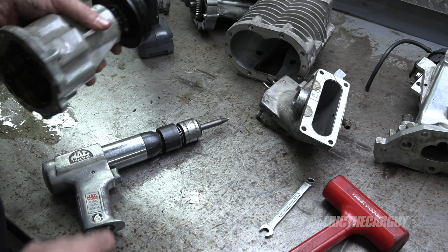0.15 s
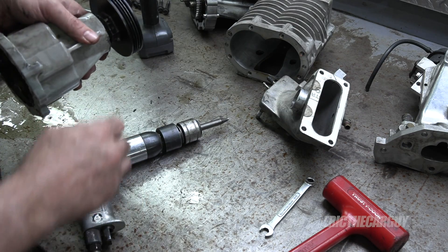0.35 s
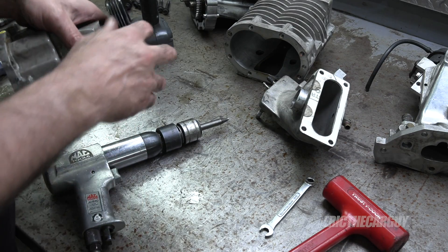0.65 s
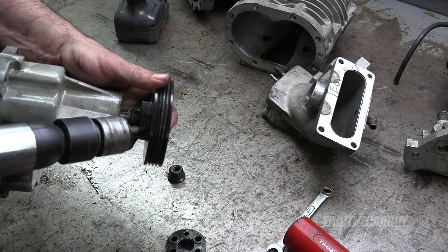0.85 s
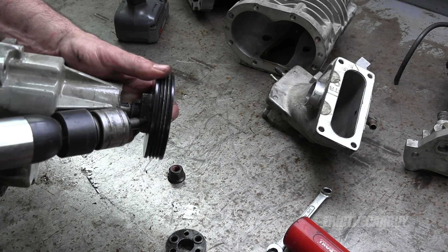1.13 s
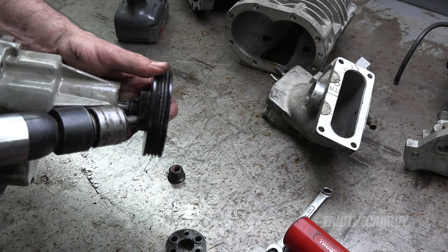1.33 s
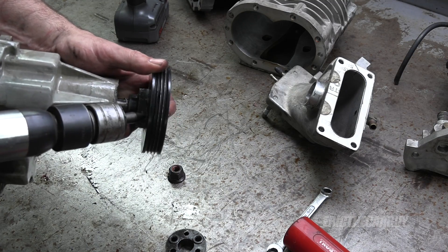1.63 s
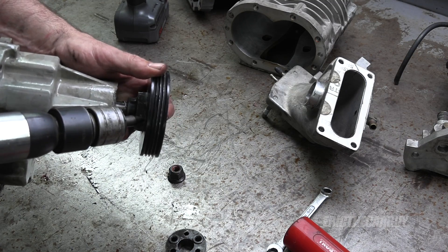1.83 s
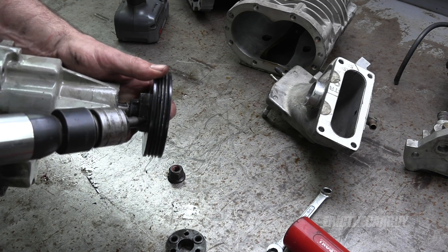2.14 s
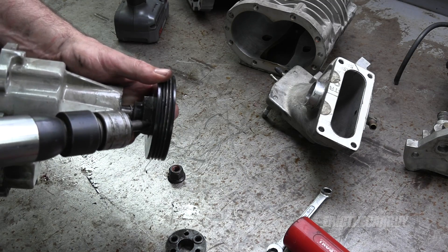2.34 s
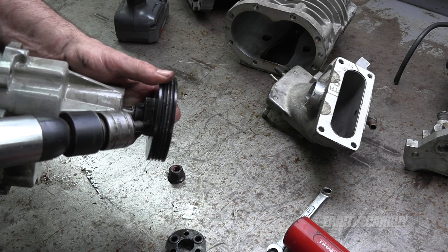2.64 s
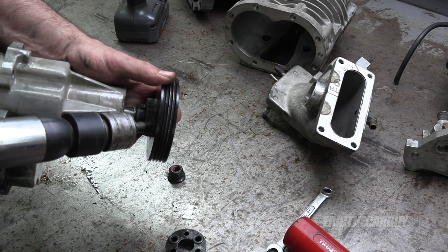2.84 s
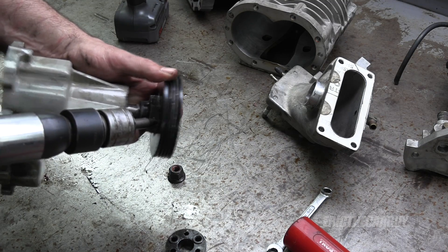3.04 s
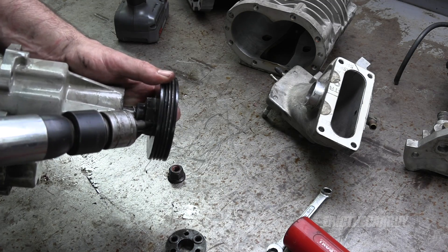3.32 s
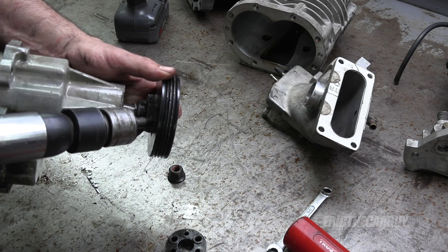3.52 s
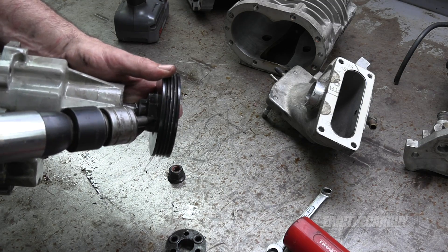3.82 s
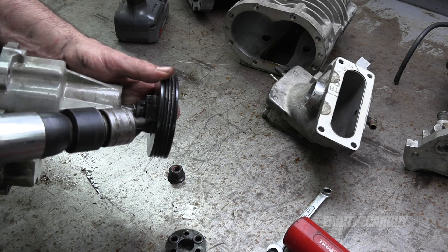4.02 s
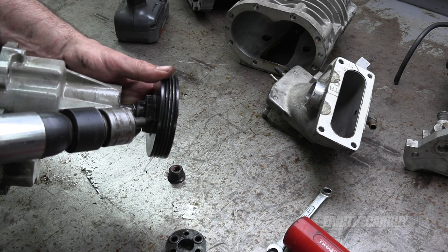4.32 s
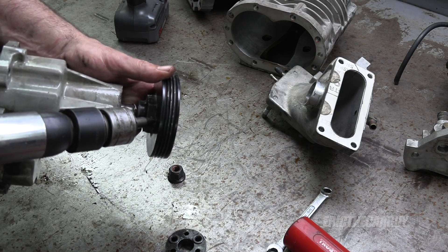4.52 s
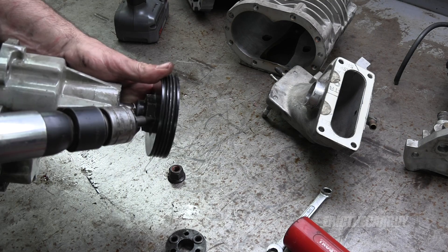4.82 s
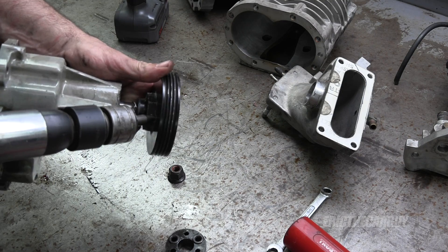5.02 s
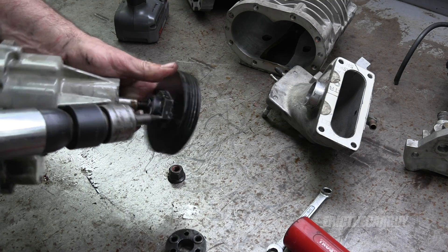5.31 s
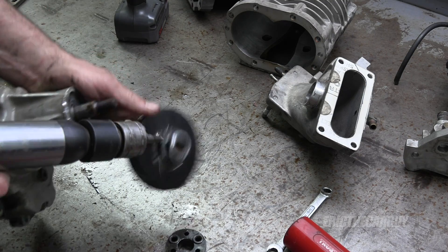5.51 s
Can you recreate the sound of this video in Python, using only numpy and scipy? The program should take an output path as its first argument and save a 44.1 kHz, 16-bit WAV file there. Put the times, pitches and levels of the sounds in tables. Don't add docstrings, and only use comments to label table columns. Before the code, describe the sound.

Close at a workbench, low room rumble gives way abruptly to a pneumatic chisel. Valve hiss and exhaust puffs precede hard steel cracks in groups of two or three, about three groups a second. A high metallic whistle and hub ring fade between them, fading faster as the part loosens. Last blows knock it free; it jingles, clatters and lands. The loud hits sound squashed and slightly distorted.

```python
import sys
import numpy as np
from scipy import signal
from scipy.fft import rfft, irfft, next_fast_len
from scipy.io import wavfile
from scipy.ndimage import uniform_filter1d, minimum_filter1d, map_coordinates

SR = 44100
rng = np.random.default_rng(int(sys.argv[2]) if len(sys.argv) > 2 else 0)


def generate_wav(signal):
    frames = np.transpose(np.atleast_2d(signal))
    scaled = np.clip(frames, -1, 1) * 32767
    pcm = np.round(scaled).astype(np.int16)
    wavfile.write(sys.argv[1], SR, pcm)


def voltage_ratio(decibels):
    exponent = np.asarray(decibels, float) / 20
    return 10 ** exponent


N = 249606
T = np.arange(N) / SR

# (time [s], rumble level [dB], air level [dB])
SHOP_LEVELS = [
    (0, -41.5, -50),
    (.3, -41.5, -46),
    (.55, -39.5, -46),
    (.75, -34, -45.5),
    (.838, -42, -46.5),
    (.842, -38, -54),
    (.912, -48, -54),
    (.93, -74, -57),
    (5.66, -59.5, -78),
]
# (time [s], level [dB])
PART_SET_DOWN = [
    (0.588, -34.5),
]
# (frequency [Hz], gain [dB])
RUMBLE_COLOUR = [(15, -30), (30, -6), (45, -18), (58, 7.5), (75, -13), (110, -2.5), (140, -20.5),
                 (200, -42), (400, -100)]
AIR_COLOUR = [(90, -40), (150, 1), (250, -5.5), (600, -9.5), (1500, -14.5), (1980, -17.5), (2500, -21),
              (3800, -25.5), (4700, -23), (5600, -26), (7500, -20.5), (12000, -27), (14500, -20),
              (15800, -19.5)]
# (frequency [Hz], width [Hz], level [dB])
FAR_MACHINES = [(645, 220, 0.5), (2000, 90, 4), (2950, 200, 0), (4600, 400, 0)]

# (end time [s], level [dB], air flows on for [s],
# speed of the fade [factor], whistle over the level [dB])
WASH = [(1.081, -20.5, 0.17, 0.52, -5.5), (1.468, -24, 0.2, .8, -2.5), (1.758, -25, 0.2, .7, 0),
        (2.083, -24.5, 0.12, 0.65, -0.5), (2.378, -25, 0.073, 1.02, 0), (2.822, -26.5, 0.041, 1.2, 1.5),
        (3.167, -26, 0.039, 0.93, 1.5), (3.644, -28.5, 0.0031, 1.6, 0), (3.895, -26.5, .005, 1.06, 1.5),
        (4.22, -27, 0.0027, 1.6, -0.5), (4.544, -29.5, .005, 1.5, -2.5), (4.792, -27.5, .005, 1.34, -3),
        (5.077, -28, .005, 1.5, -8), (5.485, -28, 0.0028, 2, -4.5)]
# (frequency [Hz], gain [dB])
BOOM_COLOUR = [(25, -8.5), (60, -7), (150, -6.5), (240, 0), (330, -4), (600, -5), (900, -6), (1500, -78)]
BODY_COLOUR = [(290, -44), (500, -10), (557, -50), (661, -5), (2040, -3), (3640, -5.5), (4140, -5.5),
               (5020, -10.5), (6500, -14), (8450, -10), (14300, -120)]
TOP_COLOUR = [(8000, -7), (9500, 4.5), (11000, -4.5), (12600, -1.5), (13500, -15), (14400, -6),
              (15000, -15), (15900, -17)]
# (frequency [Hz], width [Hz], level [dB])
PORT_MODES = [(229, 20, 4)]
HUB_MODES = [(956, 18, 3.5), (1229, 18, 1), (1530, 22, 3), (2013, 19, 6), (4214, 30, 1.5), (1948, 120, 6),
             (2240, 28, -3), (2765, 145, 2), (4040, 42, 9), (4125, 24, 10), (4560, 43, 4.5), (5240, 50, -3)]
EDGE_MODES = [(12940, 220, 9), (14250, 200, 2)]
# (time [s], frequency [Hz])
WHISTLE_CENTRE = [(.9, 8350), (2.4, 8170), (3.3, 7950), (4, 7770), (5.66, 7850)]
# (offset from centre [Hz], gain [dB])
WHISTLE_SKIRT = [(-2600, -19), (-1500, -10), (-700, -1), (-250, 0.5), (2, 4.5), (250, 1), (700, 1),
                 (1300, -14), (2186, -22)]
# (offset from centre [Hz], width [Hz], level [dB])
WHISTLE_CORE = [(60, 190, 0)]
# boom, body, whistle, top
# level over the wash [dB], its drift [dB/s], and its rise while the blows fall [dB]
OVER_DB = [-11.5, -0.3, -0.7, -13.5]
DRIFT_DB_PER_S = [0.12, 0.01, 0.01, 1.96]
STRUCK_DB = [5.5, -3.5, -1.5, -1.5]
SWELL_DB_PER_S = [2, 17.5, 19, -3]
LONGEST_SWELL_S = [0.25, .25, 0.073, 0.058]
FADE_DB_PER_S = [50.3, 47.7, 61.5, 77]
FLOOR_DB = [-50.5, -36, -40, -52]
OPENING_DB = [-24, -37, -32, -22]
SETTLED_DB = [-23, -24.5, -30.5, -41]

# (frequency [Hz], level [dB], T60 [s])
FREE_MODES = [(4064, -27, 0.35), (7900, -23.5, 0.7), (7842, -28, 0.4), (7915, -19, .1), (11294, -36, 0.8),
              (11420, -35, .7), (11360, -17, 0.07), (14800, -24, 0.025)]
LANDING_MODES = [(985, -22, 0.12), (2200, -13.5, .03), (2760, -24, 0.066), (4097, -1.5, .15),
                 (5916, -24, 0.046), (7950, -19, 0.073), (8350, -23, .05), (13280, -27, .3)]
# (time [s], level [dB], frequency [Hz])
CLATTER = [(5.3662, -15, 2850), (5.4545, -12, 3080), (5.462, -24, 1000), (5.372, -23, 2000),
           (3.898, -22, 1900), (3.174, -23, 1980), (4.834, -27, 1880), (.9185, -20, 2200),
           (.938, -17, 4200), (.917, -14, 950), (.94, -17, 1000), (5.403, -17, 1900), (5.393, -15, 540)]

# (time [s], jet level [dB], length [s])
TRIGGER_OPENINGS = [(0.9175, -19, 0.02), (0.944, -24, .02), (1.305, -15.5, 0.023), (1.641, -20.5, 0.03),
                    (1.927, -24, 0.026), (2.221, -23.5, 0.018), (2.705, -28, .025), (3.018, -32, 0.02),
                    (3.467, -37, 0.02), (3.779, -34.5, 0.024), (4.099, -33, 0.025), (4.43, -37, .018),
                    (4.683, -36, .016), (5.256, -31, 0.02)]
# (frequency [Hz], gain [dB])
JET_COLOUR = [(1500, -36), (4000, 1.5), (6500, 6.5), (9500, 6.5), (11000, 2.5), (13500, 3), (14900, -3),
              (15900, 2.5)]

# (time [s], peak level [dB], 2 kHz ring [dB], 4 kHz ring [dB], 8 kHz ring [dB])
FIRST_BLOWS = [(0.9645, 1, -7, -1, -24), (1.3473, -7.5, -1.5, -7, -22), (1.6838, 2, -6, -11, -13),
               (1.9648, -5.5, -9, -14, -13), (2.2624, -4, -6, -9, -8.5), (2.7488, 3, -13, -10, -14),
               (3.0572, -0.5, -7, -7.5, -16), (3.5052, -4, -7, -4, -10), (3.824, 3, -13, -8, -9),
               (4.1452, 1.5, -23, -7, -9), (4.4684, -5.5, -9, -3, -22), (4.7181, -6.5, -4.5, -11, -32),
               (5.0037, -7.5, -3.5, -3, -27), (5.3016, 7, -23, -27, -18)]
NEXT_BLOWS = [(1.005, -1, -5, -7.5, -6), (1.051, -8, -1, -2, -3), (1.39, 2, -8, -15, -11),
              (1.4384, -6, 0.5, -7, -5), (1.727, -2, -4, -16, -10), (2.0061, -1.5, -7.5, -17, -9),
              (2.053, -5, -5, -11, -6.5), (2.303, 0, -7.5, -11, -6), (2.3478, -2.5, -8, -18, -10.5),
              (2.7921, -4, -8, -6, -8), (3.0974, 1, -16, -15, -11), (3.1367, 2, -13, -19, -10),
              (3.5488, 1, -26, -12, -9), (3.6131, -8.5, -8, -5, -12), (3.8647, -0.5, -31, -13, -9),
              (4.1906, -4, -16, -14, -11.5), (4.514, -1, -15, -16, -13), (4.7625, -0.5, -17, -27, -14),
              (5.047, 0, -10.5, -16, -15), (5.34, 5.5, -10, -15, -17), (5.3903, -6.5, -23, -27, -19)]
SPIKE_TIMES = [.9619, 1.0013, 1.049, 1.3447, 1.3882, 1.4352, 1.6819, 1.7246, 1.9615, 2.0037, 2.0502, 2.26,
               2.3016, 2.3455, 2.7466, 2.79, 3.0544, 3.0958, 3.1349, 3.5012, 3.5464, 3.6093, 3.8213, 3.8627,
               4.1431, 4.1877, 4.4636, 4.5111, 4.7139, 4.76, 5.0007, 5.0453, 5.2992, 5.3387, 5.3876]
# (level [dB], port echo [dB], edge ring [dB])
SLUGS = [(-16, 0, -28), (-18, 2, -28), (-16, -1, -28), (-15, -2, -28), (-14, -5, -30), (-18, -4, -28),
         (-17.5, -3, -30), (-19, -2, -28), (-15, -2, -28), (-18, 2, -28), (-20, 0, -26), (-16, 1, -26),
         (-16, 4, -28), (-21, 8, -26), (-16, -1, -24), (-18, 2, -19), (-17, 0, -25), (-19, 4, -23),
         (-16, -1, -20), (-18, -2, -25), (-16, 0, -23), (-26, -2, -19), (-17, 0, -23), (-17, 1, -21),
         (-15, 0, -24), (-22, -1, -20), (-17, -5, -25), (-15, -1, -26), (-19, -1, -25), (-15, -2, -24),
         (-19, 2, -26), (-17, 0, -27), (-16, 0, -34), (-17, 2, -32), (-23, -6, -36)]
# (time [s], level [dB], second slug [dB])
VALVE_PUFFS = [(0.9147, -15, -14), (.935, -11, 1.5), (1.023, -17, -6), (1.201, -26, -6), (1.246, -26, -4),
               (1.318, -11.5, 6), (1.654, -10.5, -0.5), (1.946, -13.5, -17), (2.233, -15, -1),
               (2.7191, -16.5, -3), (3.0276, -27, -15), (3.0373, -24, -20), (3.485, -21.5, -16),
               (3.7936, -19.5, -8), (4.115, -21.5, -2), (4.446, -23.5, -11), (4.677, -34, -15),
               (4.6995, -24, -6), (4.952, -27, -13), (4.984, -22, -5), (5.0636, -21, -15),
               (5.2722, -19.5, -2)]
# (time [s], delay [s], level [dB])
RETURN_PUFF = [
    (2.2, 0.019, -32),
    (3.0, 0.013, -23),
    (4.2, .0125, -24),
    (4.5, .0135, -21.5),
    (5.0, 0.014, -21),
]
# (frequency [Hz], gain [dB])
CRACK_COLOUR = [(200, -11), (350, 3.5), (900, 4), (1550, -1), (2000, 3.5), (2700, 5.5), (3400, 0.5),
                (4200, 3.5), (5800, -7.5), (8000, 3), (10300, -5.5), (13000, -9.5), (13600, -9),
                (16000, -15)]
# (frequency [Hz], level in group [dB], T60 [s])
LOW_MODES = [(942, -6.5, 0.034), (2016, -1.5, 0.12), (2203, -10, 0.053), (2810, -5, 0.035)]
MID_MODES = [(4020, -9, 0.091), (4028, -15.5, 0.098), (4126, -5.5, 0.15), (4178, -9.5, 0.073),
             (4590, -8, 0.073)]
# (offset from its centre [Hz], level in group [dB], T60 [s])
HIGH_MODES = [(-180, -3, 0.064), (-39, -11, 0.034), (168, 0.5, 0.084)]
# (frequency [Hz], level under the blow [dB], T60 [s])
CHISEL_MODES = [(4110, -3, .014), (955, -16, .018), (4600, -13, .04)]

WHISTLE_LAYER, TOP_LAYER = 2, 3
OPEN_S, RISE_S, SETTLE_S = .915, 0.0054, 0.03
LEAD_S, BUILD_S = 0.043, 0.038
LOOSE_S, DROP_S = 5.392, 5.6414
FREED_DB = -9
RESTRIKE_S, RESTRIKE_DB = 5.9, -12
SEAT_S = .0016
SPIKE_S = 3 / 1000


def unit(x):
    return x / np.sqrt(np.mean(x ** 2) + 1e-20)


def curves(rows):
    s, *cols = np.transpose(rows)
    return [np.interp(T, s, c) for c in cols]


def colour(points, hz):
    f, db = np.transpose(points)
    return voltage_ratio(np.interp(np.log(hz + 1), np.log(f), db))


def noise(gain, n=N):
    hz = np.fft.rfftfreq(next_fast_len(n + 2048), 1 / SR)
    spectrum = rfft(rng.standard_normal(2 * len(hz) - 2))
    return unit(irfft(gain(hz) * spectrum)[:n])


def patchy(gain, patchy_db):
    hz, s, z = signal.stft(rng.standard_normal(N), SR, nperseg=512)
    field = uniform_filter1d(rng.standard_normal(z.shape), size=4, axis=0)
    field = uniform_filter1d(field, size=4, axis=1)
    shaped = z * gain(hz[:, None], s) * voltage_ratio(patchy_db * unit(field))
    return unit(signal.istft(shaped, SR, nperseg=512)[1][:N])


def peaks(modes, hz):
    return sum(voltage_ratio(2 * db) / (1 + (2 * (hz - c) / w) ** 2) for c, w, db in modes)


def ring(hz, db, t60, t, attack=0.0005):
    return voltage_ratio(db - 60 * t / t60) * (1 - np.exp(-t / attack)) * np.sin(2 * np.pi * hz * t)


def flutter(depth_db, knots, rate_hz, t):
    return voltage_ratio(depth_db * map_coordinates(rng.standard_normal(knots), [t * rate_hz]))


def crack(t):
    return noise(lambda hz: colour(CRACK_COLOUR, hz), len(t))


def add(track, s, sound):
    track[round(s * SR):][:len(sound)] += sound


def shop():
    rumble_db, air_db = curves(SHOP_LEVELS)
    rumble = noise(lambda hz: colour(RUMBLE_COLOUR, hz))
    air = patchy(lambda hz, s: colour(AIR_COLOUR, hz) * np.sqrt(1 + peaks(FAR_MACHINES, hz)), patchy_db=1.5)
    out = voltage_ratio(rumble_db) * rumble + voltage_ratio(air_db) * air
    for s, db in PART_SET_DOWN:
        add(out, s, ring(840, db + 0.5, .04, T[:3000]))
    return out


def hang(layer):
    knots = [(OPEN_S, -70), (OPEN_S + RISE_S, OPENING_DB[layer]), (OPEN_S + SETTLE_S, SETTLED_DB[layer])]
    starts = [row[0] for row in FIRST_BLOWS] + [DROP_S + LEAD_S]
    for start, following, (end, db, flow, speed, whistle_db) in zip(starts, starts[1:], WASH):
        level = db + OVER_DB[layer] + DRIFT_DB_PER_S[layer] * (end - OPEN_S)
        level += whistle_db * (layer == WHISTLE_LAYER)
        level += FREED_DB * (layer == TOP_LAYER and end > LOOSE_S)
        left = following - LEAD_S - end
        swell = np.clip(min(flow, LONGEST_SWELL_S[layer]), 1e-3, left - 1e-3)
        crest = level + SWELL_DB_PER_S[layer] * swell
        faded = crest - speed * FADE_DB_PER_S[layer] * (left - swell)
        if start > starts[0]:
            knots.append((start + BUILD_S, level + STRUCK_DB[layer]))
        knots += [(end, level), (end + swell, crest), (end + left, faded)]
    return np.hypot(voltage_ratio(curves(knots)[0]), voltage_ratio(FLOOR_DB[layer]) * (T > OPEN_S + RISE_S))


def whistle_wash():
    def gain(hz, s):
        off = hz - np.interp(s, *np.transpose(WHISTLE_CENTRE))
        skirt = voltage_ratio(np.interp(off, *np.transpose(WHISTLE_SKIRT), -90, -90))
        return skirt * np.sqrt(1 + peaks(WHISTLE_CORE, off))
    return patchy(gain, patchy_db=1.6)


def garage():
    boom = noise(lambda hz: colour(BOOM_COLOUR, hz) * np.sqrt(1 + peaks(PORT_MODES, hz)))
    body = patchy(lambda hz, s: colour(BODY_COLOUR, hz) * np.sqrt(1 + peaks(HUB_MODES, hz)), patchy_db=0.5)
    top = noise(lambda hz: colour(TOP_COLOUR, hz) * np.sqrt(1 + peaks(EDGE_MODES, hz)))
    layers = [boom, body, whistle_wash(), top]
    return sum(hang(layer) * sound for layer, sound in enumerate(layers))


def loose_hub():
    out, t = np.zeros(N + SR), np.arange(SR // 3) / SR

    def tumbling():
        return sum(ring(*mode, t) * flutter(3.5, 70, 190, t) for mode in FREE_MODES)

    add(out, LOOSE_S, tumbling())
    add(out, RESTRIKE_S, voltage_ratio(RESTRIKE_DB) * tumbling())
    for s, db, hz in CLATTER:
        dull = noise(lambda f: colour(CRACK_COLOUR, f) / (1 + (f / 6000) ** 6), len(t))
        add(out, s, ring(hz, db, 0.015, t) + voltage_ratio(db - 5.0 - 60 * t / 0.022) * dull)
    knock = voltage_ratio(-28.5) / (1 + (t / 0.012) ** 5) * crack(t)
    landing = sum(ring(*mode, t, attack=0.0031) for mode in LANDING_MODES)
    add(out, DROP_S, knock + landing * (0.31 + 0.49 / (1 + (t / 0.0057) ** 6)))
    return out[:N]


def trigger():
    out, t = np.zeros(N + SR), np.arange(SR // 12) / SR
    for s, db, length in TRIGGER_OPENINGS:
        shape = (1 - np.exp(-(t / 0.0044) ** 2)) / (1 + (t / length) ** 4)
        jet = noise(lambda hz: colour(JET_COLOUR, hz), len(t))
        add(out, s, voltage_ratio(db + 2) * shape * flutter(2.5, 40, 300, t) * jet)
    return out[:N]


def puff(db, second_db, t, echo_db):
    def spike(at):
        return (((t - at) / 0.00091) ** 2 - 1) * np.exp(-((t - at) / 0.00085) ** 2 / 2)

    slug = spike(SPIKE_S) + ring(rng.normal(220, 12.0), -5, 0.025, t, attack=0.006)
    slug += ring(rng.normal(495, 22), -5.5, 0.02, t, attack=0.00094)
    echo = voltage_ratio(echo_db) * spike(SPIKE_S + .0042)
    second = voltage_ratio(second_db) * np.pad(slug, (round(0.00848 * SR), 0))[:len(t)]
    hiss = noise(lambda hz: colour(CRACK_COLOUR, hz) * (hz > 700), len(t))
    spit = voltage_ratio(-8.5 - 60 * t / 0.074) * (1 - np.exp(-t / 0.0032)) * hiss
    return voltage_ratio(db + 2) * (slug + echo + second + spit)


def valve_puffs(out, t):
    at, delay, back_db = np.transpose(RETURN_PUFF)
    returns = [(s + np.interp(s, at, delay), np.interp(s, at, back_db), -5) for s, *_ in FIRST_BLOWS]
    for s, db, second_db in VALVE_PUFFS + returns:
        add(out, s, puff(db, second_db, t, echo_db=-4))


def recoil(db, t):
    turns = 30 * t + 60 * .015 * (1 - np.exp(-t / 0.0069))
    return voltage_ratio(db - 60 * t / 0.17) * (1 - np.exp(-t / 0.0011)) * np.sin(2 * np.pi * turns)


def bench_thump(puff_db, t):
    upper = ring(rng.normal(335, 35), puff_db + 3, 0.024, t, attack=0.0015)
    return upper + ring(rng.normal(115, 20), puff_db - 5, 0.05, t, attack=0.002)


def chatter(hold, t):
    seated = 1 / (1 + (t / (hold + SEAT_S)) ** 6)
    decay = voltage_ratio(-60 * t / 0.061) * seated + voltage_ratio(-11 - 60 * t / 0.11)
    return (1 - np.exp(-(t / 0.002) ** 2)) * decay * crack(t)


def hub_ring(s, low_db, mid_db, high_db, t):
    centre = np.interp(s, *np.transpose(WHISTLE_CENTRE))
    groups = [(low_db, 0, LOW_MODES, .003), (mid_db, 0, MID_MODES, .0008), (high_db, centre, HIGH_MODES, .001)]
    out = 0
    for level, base_hz, modes, attack in groups:
        for hz, own_db, t60 in modes:
            out = out + ring(base_hz + hz, level + own_db + rng.normal(0, 1.8), t60, t, attack)
    return out


def chisel_ring(db, t):
    late, out = t - 1 / 1000, 0
    for hz, own_db, t60 in CHISEL_MODES:
        level = own_db - db / 2 + rng.normal(0, 1.5)
        out = out + ring(hz * rng.normal(1, 0.01), level, t60, late, attack=1 / 700) * (late > 0)
    return out


def hammer():
    out, t, last = np.zeros(N + SR), np.arange(SR // 8) / SR, 0
    blows = sorted(FIRST_BLOWS + NEXT_BLOWS)
    for (s, db, low_db, mid_db, high_db), spike_s, (puff_db, echo_db, edge_db) in zip(blows, SPIKE_TIMES, SLUGS):
        hold = .007 if s - last > 1 / 10 else .0105
        hold *= .35 if s > LOOSE_S - 1 / 100 else 1
        add(out, s - SEAT_S, voltage_ratio(db - 6.5) * chatter(hold, t))
        contact = 1 / (1 + (t / hold) ** 6)
        modes = hub_ring(s, low_db, mid_db, high_db, t) * (0.27 + 0.58 * contact)
        edge = ring(rng.normal(12960, 60), edge_db, .07, t)
        add(out, s, voltage_ratio(db) * (chisel_ring(db, t) + edge + modes))
        add(out, spike_s - SPIKE_S, puff(puff_db, -17.5, t, echo_db))
        add(out, s - .001, recoil(-18 - 1.77 * s, t))
        add(out, s + 0.0016, bench_thump(puff_db, t))
        last = s
    valve_puffs(out, t)
    return out[:N]


def scene():
    return (shop() + garage() + loose_hub() + trigger() + hammer())[None]


def band_limit(x):
    return signal.sosfilt(signal.butter(12, 16990, fs=SR, output="sos"), x)


def record(dry):
    level = np.sqrt(np.abs(uniform_filter1d(dry ** 2, size=90)))
    gain = minimum_filter1d(np.minimum(1, voltage_ratio(-10.5) / (level + 1e-9)) ** 1.01, size=130)
    x = dry * uniform_filter1d(gain, size=90)
    x = x / (1 + np.abs(x / 0.54) ** 5) ** (1 / 5)
    over_hz = np.clip(np.fft.rfftfreq(N, 1 / SR) - 15730, 0, None)
    x = irfft(rfft(x) * voltage_ratio(-.2 * over_hz), N)
    return band_limit(x)


dry = scene()
out = record(dry)
generate_wav(out)
```